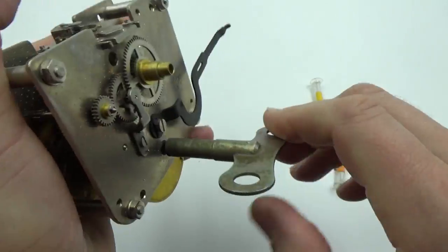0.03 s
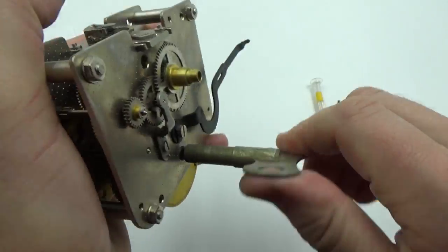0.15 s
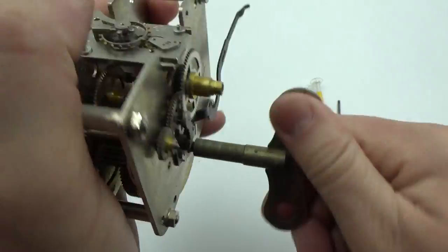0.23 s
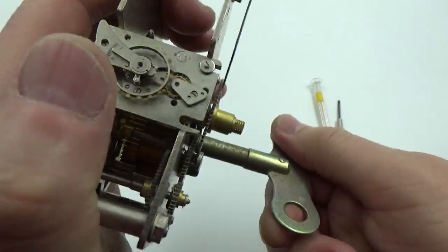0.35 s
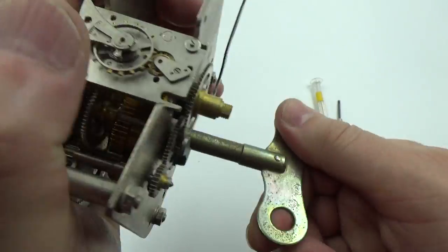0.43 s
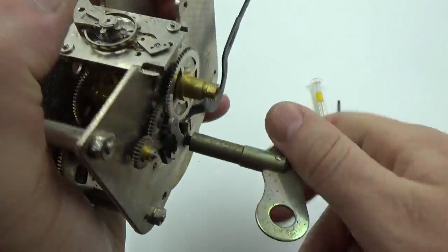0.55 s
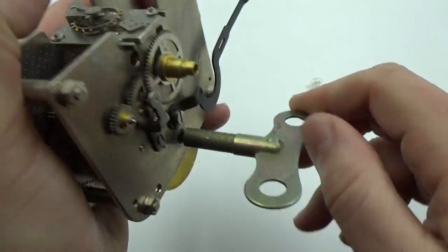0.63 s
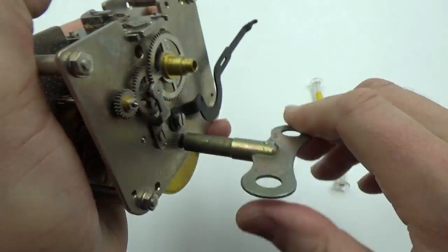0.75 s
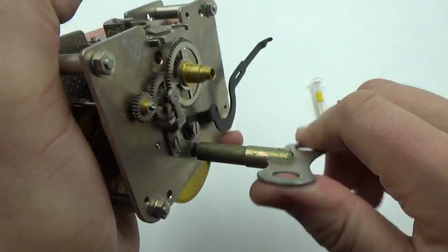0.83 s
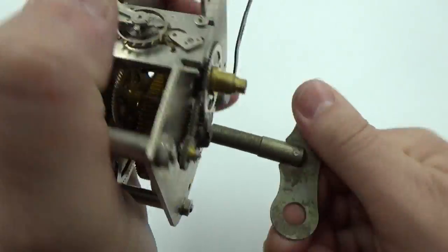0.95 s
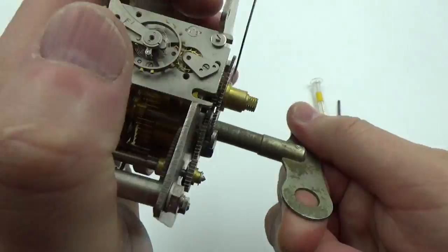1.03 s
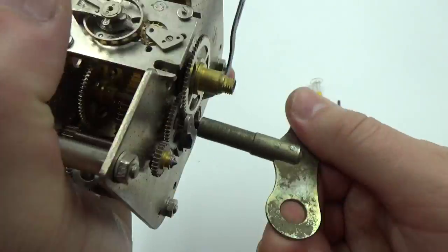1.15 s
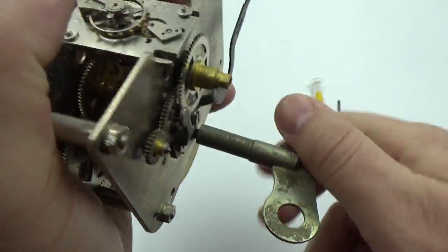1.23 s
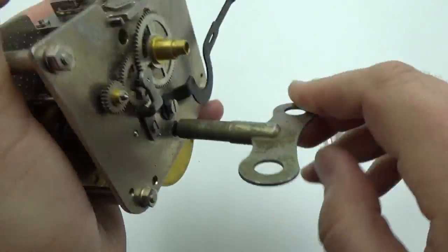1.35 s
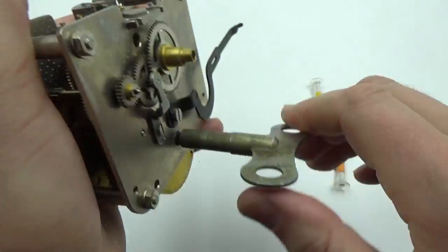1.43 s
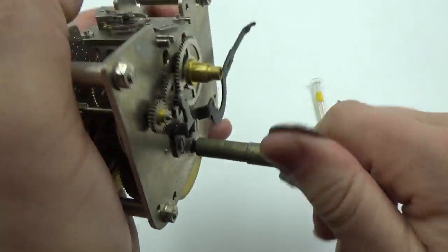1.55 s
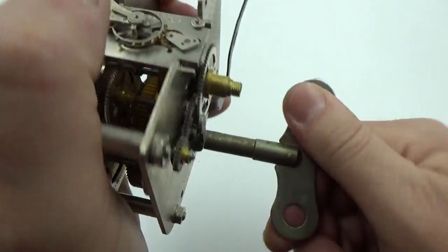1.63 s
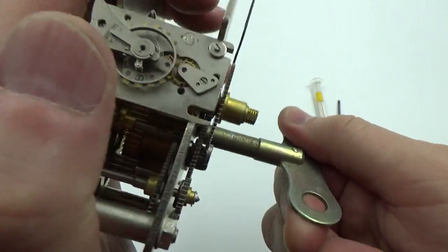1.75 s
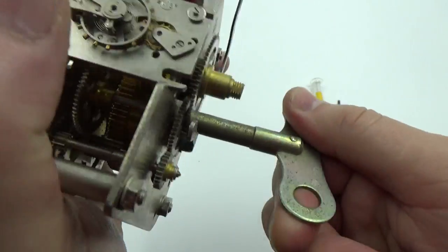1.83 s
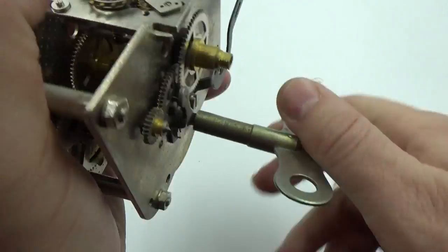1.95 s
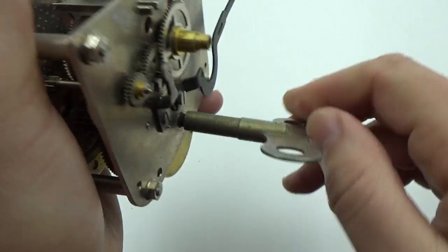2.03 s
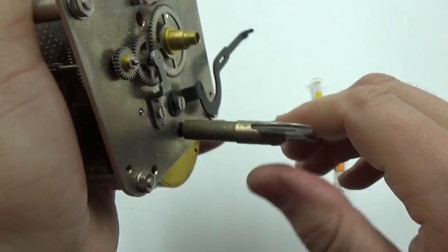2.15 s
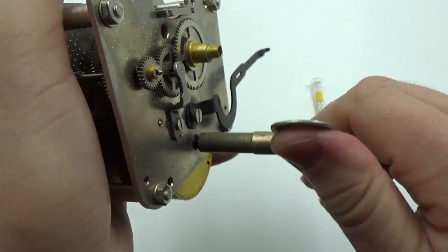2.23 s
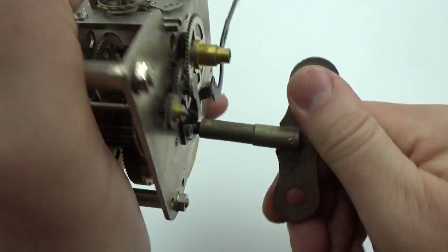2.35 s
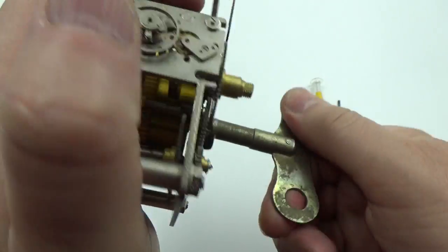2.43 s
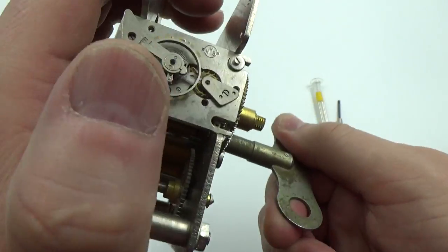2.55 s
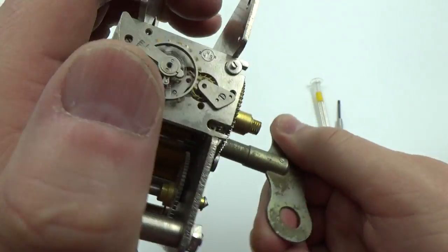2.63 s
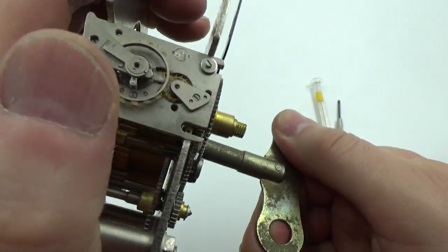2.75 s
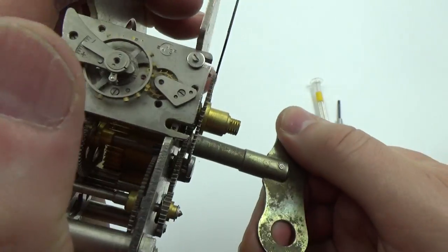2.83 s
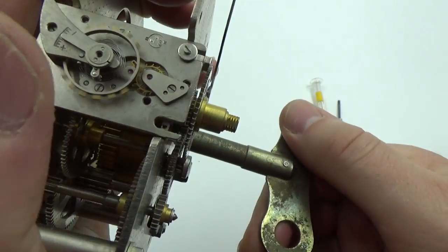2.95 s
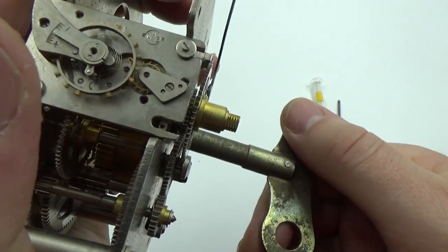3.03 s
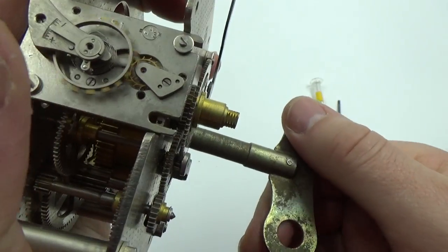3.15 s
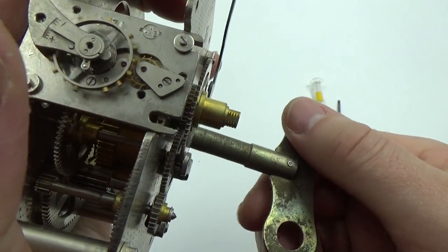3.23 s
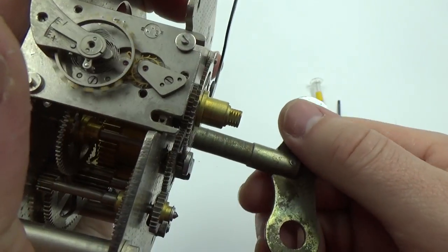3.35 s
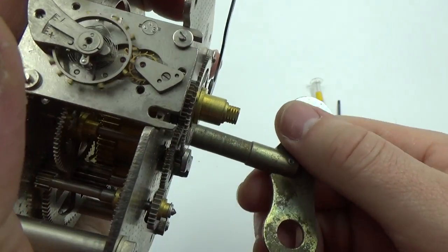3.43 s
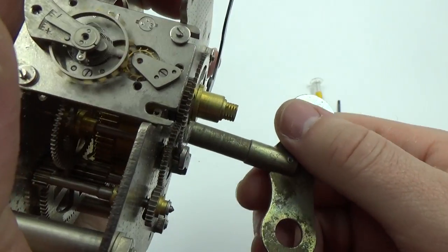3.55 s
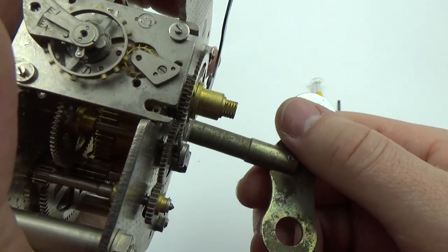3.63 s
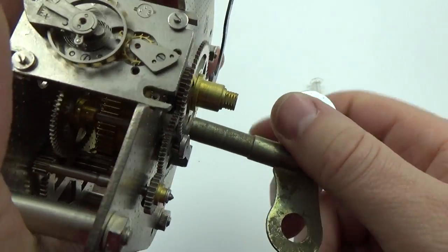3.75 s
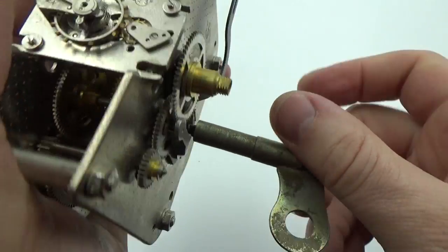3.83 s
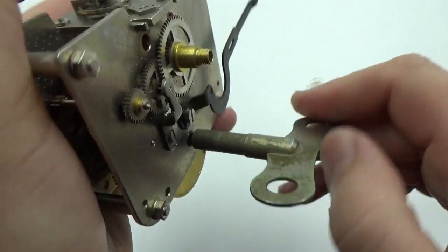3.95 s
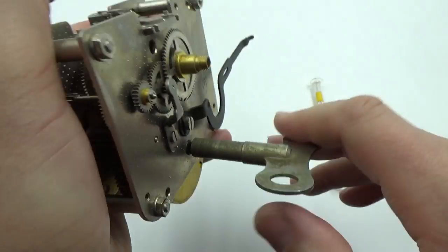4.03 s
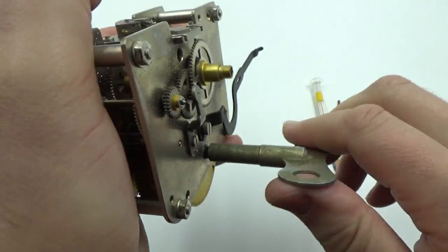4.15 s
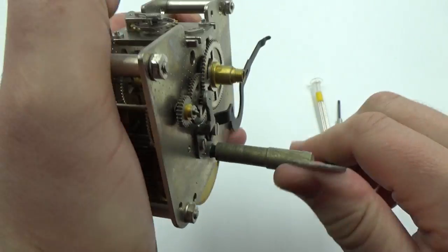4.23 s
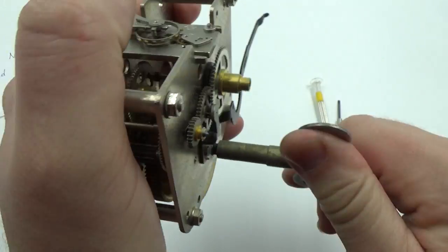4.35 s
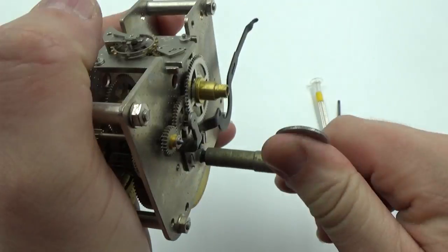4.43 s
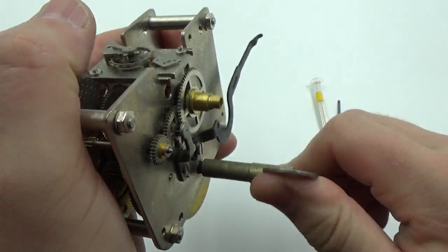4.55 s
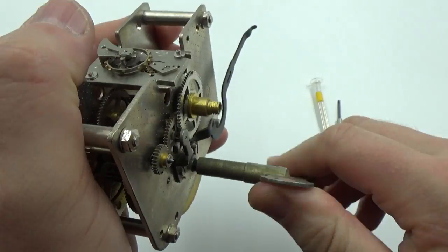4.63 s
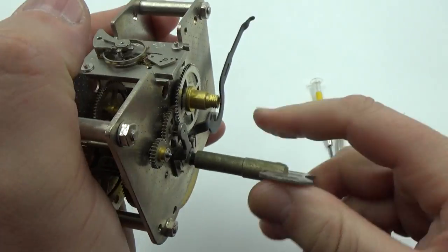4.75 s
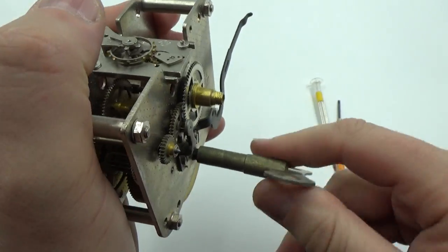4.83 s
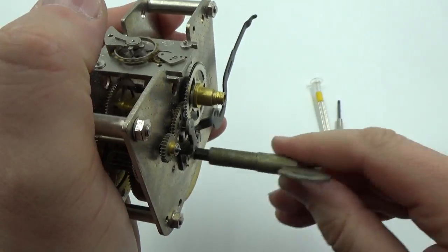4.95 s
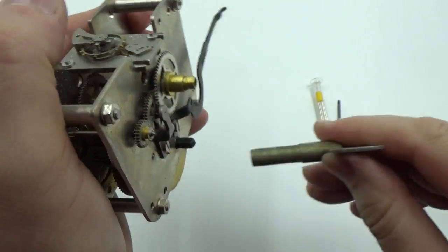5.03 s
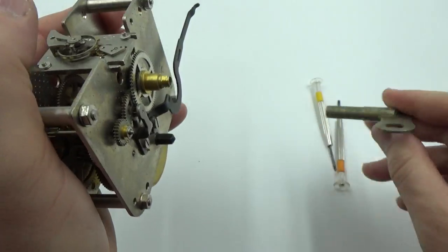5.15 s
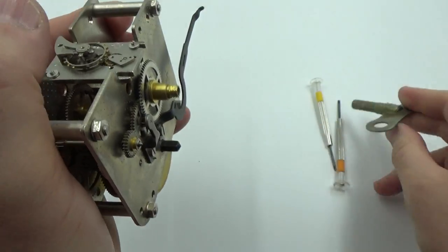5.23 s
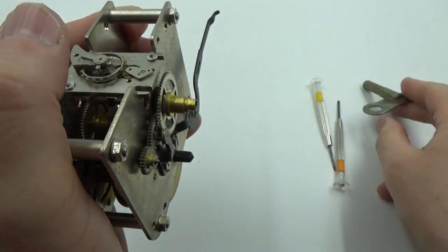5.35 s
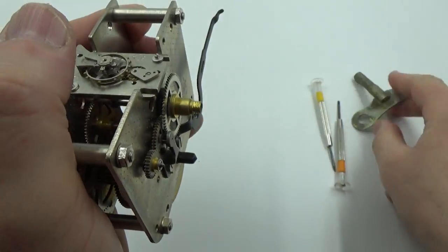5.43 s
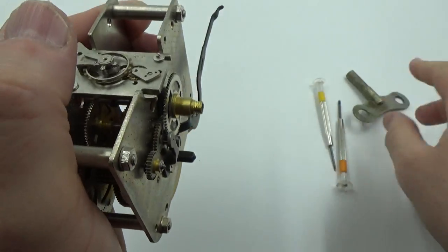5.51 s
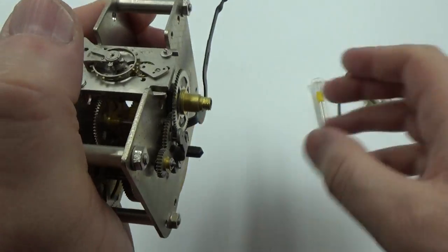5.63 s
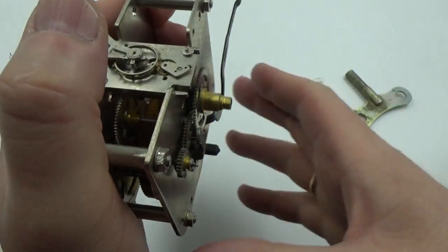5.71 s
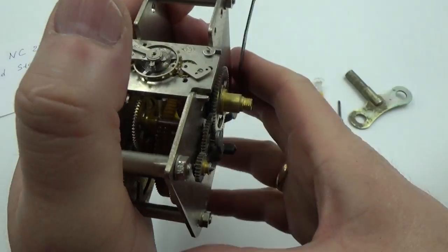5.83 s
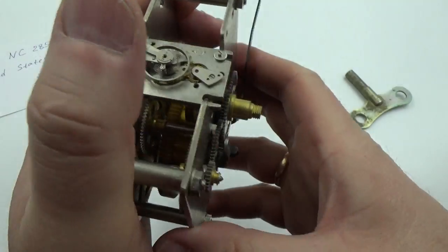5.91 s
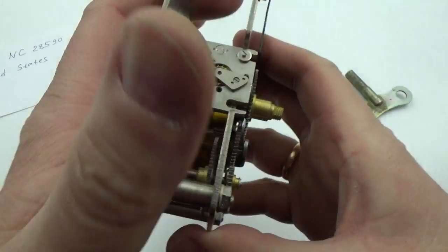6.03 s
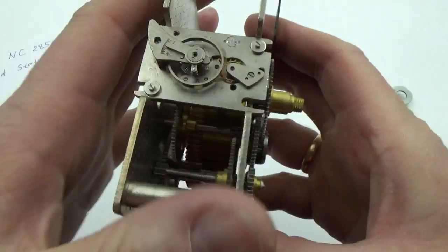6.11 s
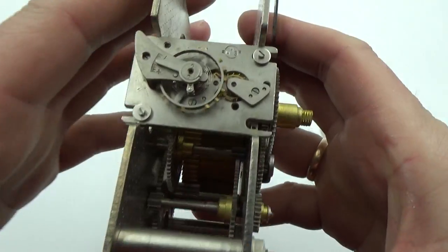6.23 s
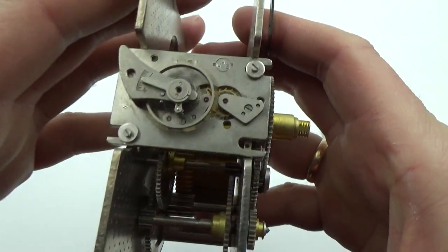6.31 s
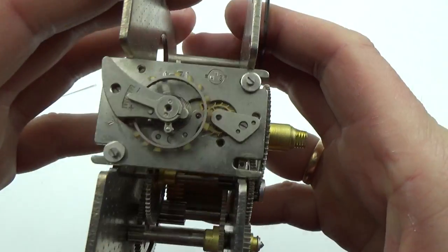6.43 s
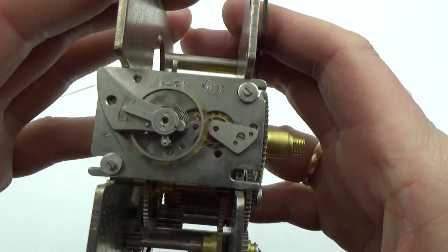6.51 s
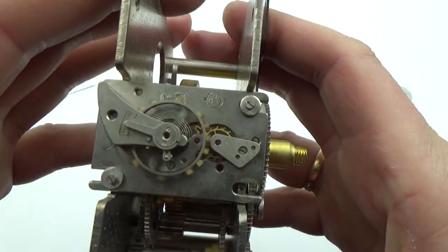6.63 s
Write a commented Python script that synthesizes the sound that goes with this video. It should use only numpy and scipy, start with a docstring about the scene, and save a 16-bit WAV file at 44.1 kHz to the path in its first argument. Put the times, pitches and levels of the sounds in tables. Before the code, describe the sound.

Very close in a small quiet room, a hand-held clock movement ticks fast and evenly, five times a second. A key winds it in four brisk bursts of bright, buzzing ratchet clicks, with clacks as the pawl catches between turns. After a pause of bare ticking comes a two-click turn; the key slides off with a light ring, lands on the bench with a woody thud and rocks to rest. Ticking continues.

```python
"""In a small room a hand-held clock movement is wound with its key, close to the microphone.
Four turns and a short fifth of ratchet clicks ring the steel plates; after each the pawl takes the spring's load.
The escapement ticks five times a second throughout. The key is drawn off its arbor and dropped on the bench.
Struck parts are noise-like contacts or short pushes exciting damped modes and a dense decaying tail;
slides are uneven grains of noise, thin parts are decaying sines, and air noise and a motor's hum lie beneath."""
import sys
import numpy as np
from scipy import signal
from scipy.fft import rfft, irfft
from scipy.io import wavfile
from scipy.ndimage import uniform_filter1d, minimum_filter1d

SR = 44100
rng = np.random.default_rng(int(sys.argv[2]) if len(sys.argv) > 2 else 0)


def materialize(psi):
    """Save the field psi as 16-bit PCM at rate SR to the path in sys.argv[1].

    A 1-D psi becomes a single channel; in a 2-D psi each row is a channel.
    """
    bounded = np.clip(np.atleast_2d(psi).T, -1, 1)
    quanta = np.round(bounded * 32767).astype(np.int16)
    wavfile.write(sys.argv[1], SR, quanta)


N = 294588
TIME = np.arange(N) / SR


def undb(db):
    """Level: decibels become an amplitude gain."""
    return 10 ** (np.asarray(db) / 20)


def unit(x):
    """Normalization: the energy along the last axis becomes one."""
    return x / np.sqrt(np.sum(x ** 2, axis=-1, keepdims=True))


def add(track, s, sound):
    """Superposition: a sound is summed into a track, starting at s seconds."""
    start = max(int(s * SR), 0)
    part = track[..., start:start + sound.shape[-1]]
    part += sound[..., :part.shape[-1]]


def through(x, response):
    """Linear filtering: a sound is convolved with an impulse response."""
    return signal.fftconvolve(np.atleast_2d(x), np.atleast_2d(response), axes=-1)[:, :N]


def colour(points, size=4096):
    """Minimum phase: folding the cepstrum gives a causal, unit-energy response with the given spectrum."""
    hz, db = np.transpose(points)
    bins = np.maximum(np.arange(size // 2 + 1) * SR / size, 1)
    magnitude = undb(np.interp(np.log(bins), np.log(hz), db))
    cepstrum = irfft(np.log(magnitude))
    cepstrum[1:size // 2] *= 2
    cepstrum[size // 2 + 1:] = 0
    return unit(irfft(np.exp(rfft(cepstrum))))


def pan(db):
    """Level difference between channels: left and right gains, left minus right in dB."""
    return undb(np.array([[db], [-db]]) / 2)


def stereo_noise(count, width):
    """Partial coherence: white noise whose side part is width times its mid part."""
    mid, side = rng.standard_normal((2, count))
    return np.array([mid + width * side, mid - width * side]) / np.hypot(1, width)


def tail(t60, width):
    """High modal density: countless overlapping resonances decay together, with unit energy."""
    t = TIME[:SR // 2]
    decay = np.exp(-np.log(1000) * t / t60)
    onset = 1 - np.exp(-t / 0.0029)
    return unit(stereo_noise(len(t), width) * decay * onset)


def body(blows, points, modes, dense_db, t60, width):
    """Modal superposition: the contact itself, a few strong damped modes and a wash of weak ones."""
    t = TIME[:SR // 2]
    response = undb(dense_db) * tail(t60, width)
    response[:, 0] += 1
    for hz, width_hz, db in modes:
        damping = np.pi * width_hz
        ringing = np.exp(-damping * t) * np.cos(2 * np.pi * hz * t)
        response += undb(db) * 2 * damping / SR * ringing
    return through(through(blows, response), colour(points))


def contact(rise, tilt_db=0, size=2048):
    """Contact stiffness: metal chatters for an instant, loudest after rise s; harder contacts tilt brighter."""
    u = TIME[:size] / rise
    envelope = (u * np.exp(1 - u)) ** 2
    hz = np.arange(size // 2 + 1) * SR / size
    octaves = np.log2(np.clip(hz, 2000, 11000) / 7000)
    chatter = irfft(rfft(rng.standard_normal(size)) * undb(tilt_db * octaves))
    return unit(chatter * envelope) * np.sqrt(np.sum(envelope ** 2))


def knocks(table, rise):
    """Superposed impacts: contacts from rows of (time [s], level [dB], tilt [dB per octave])."""
    track = np.zeros(N)
    for s, db, tilt_db in table:
        add(track, s - rise, undb(db) * contact(rise, tilt_db))
    return track


# spectrum of the air noise: (frequency [Hz], level [dB])
AIR_SPECTRUM = [(15, -39), (25, -9), (70, -6), (117, -7.5), (166, -3), (714, -8.5), (2550, -11.5),
                (4490, -19), (6920, -18.5), (8360, -14.5), (16000, -26)]
MOTOR_HZ, MOTOR_DB = 121.5, -81.5


def room_tone():
    """Stationary background: filtered air noise and a far motor's hum, wavering in amplitude and phase."""
    air = through(stereo_noise(N, width=0.65), colour(AIR_SPECTRUM))
    waver = np.interp(TIME, np.linspace(0, N / SR, 40), rng.standard_normal(40))
    hum = np.sqrt(2) * (1 + .25 * waver) * np.sin(2 * np.pi * MOTOR_HZ * TIME + .6 * waver)
    return undb(-68.5) * air + undb(MOTOR_DB) * hum


# spells in which the key is handled: (start [s], end [s])
HANDLING_SPELLS = [(0, 2.85), (3.85, 4.95)]
RATTLE_GAP_S = .17  # one rattle in each slot of this length
RATTLE_DB, RATTLE_SCATTER_DB, RATTLE_TILT_DB = -46.5, 3, -7.5


def rattles():
    """Random loose contact: faint knocks at uneven moments, as rows of time, level and tilt."""
    slots = np.concatenate([np.arange(start, end, RATTLE_GAP_S) for start, end in HANDLING_SPELLS])
    chance = rng.uniform(-0.79, 1, (len(slots), 3))
    rows = []
    for s, (when, force, dull) in zip(slots, chance):
        moment = s + RATTLE_GAP_S * (1 + when) / 2
        rows.append((moment, RATTLE_DB + RATTLE_SCATTER_DB * force, RATTLE_TILT_DB * (1 + dull)))
    return rows


# the key knocking on its arbor as it is gripped and let go: (time [s], level [dB], tilt [dB per octave])
KEY_KNOCKS = [(0.1579, -35.5, -11), (0.1707, -36, 6), (0.2014, -38.5, -4.5), (0.216, -34.5, 2.5),
              (0.4714, -17, 6), (0.566, -41, -21), (0.732, -42, -1.5), (0.9007, -25, 0),
              (1.1503, -30.5, 0.5), (1.242, -41.5, -19.5), (1.5228, -35.5, -4), (1.5631, -36, 5.5),
              (1.5913, -31.5, 15), (2.1109, -37, -5), (2.248, -32, -11), (2.2541, -31.5, 3.5),
              (2.3107, -25.5, -1.5), (2.6913, -38, 0), (2.7029, -22.5, 0.5), (2.8316, -36.5, 4),
              (3.2441, -51, -9.5), (3.73, -49.5, -9.5), (4.0032, -32.5, 3), (4.069, -32.5, -4.5),
              (4.2333, -44.5, 8), (4.2476, -40.5, 0), (4.268, -40.5, -0.5), (4.4659, -38.5, -2),
              (4.62, -30, 24)]
# the key eases back until the pawl takes the spring's load:
# (seated [s], level [dB], tilt [dB per octave], jolt [dB], sliding back [s])
PAWL_CATCHES = [(0.4915, -23, -0.5, -48, .028), (1.1771, -22.5, -0.5, -50.5, .012),
                (1.8746, -29.5, -3.5, -50.5, .009), (2.7286, -29.5, 1.5, -50, .03),
                (4.3654, -29, -43, -57.5, .005), (4.6134, -24.5, 1, -51, .022)]
# spectrum of the knocks: (frequency [Hz], level [dB])
KNOCK_SPECTRUM = [(40, -32), (300, -30.5), (1200, -25.5), (1800, -14.5), (3000, -12.5), (4700, -6),
                  (7000, -3.5), (9600, -2.5), (11000, -9.5), (13000, -14.5), (16000, -26.5)]
# resonances of the steel plates: (frequency [Hz], bandwidth [Hz], lift [dB])
STEEL_PLATE_MODES = [(1947, 45, 11), (2396, 38, 8.5), (2474, 50, 6), (3430, 33, 9), (4550, 110, 2.5),
                     (4850, 77, 6), (6300, 110, 0.5), (8650, 30, -7), (7800, 120, -15.5), (9680, 120, -8),
                     (9900, 720, -0.5), (11500, 340, 3), (15600, 22, -10)]
HARD_KNOCK_DB = -28  # louder knocks begin with a light touch
TOUCH_S, TOUCH_DB = 0.0041, -10  # the touch: lead before the knock, level relative to it
GRAZE_S, GRAZE_DB = 0.0058, -4.5  # the pawl grazing the tooth: lead before it seats, relative level


def clacks():
    """Impact excitation: key and pawl knock on the plates; at each catch the pawl grazes, then seats."""
    touches = [(s - TOUCH_S, db + TOUCH_DB, tilt_db) for s, db, tilt_db in KEY_KNOCKS if db > HARD_KNOCK_DB]
    grazes = [(s - GRAZE_S, db + GRAZE_DB, tilt_db) for s, db, tilt_db, _, _ in PAWL_CATCHES]
    seats = [(s, db, tilt_db) for s, db, tilt_db, _, _ in PAWL_CATCHES]
    blows = knocks(touches + KEY_KNOCKS + grazes + seats + rattles(), rise=.0009)
    plates = body(blows, KNOCK_SPECTRUM, STEEL_PLATE_MODES, dense_db=2.0, t60=0.063, width=0.4)
    return pan(.8) * plates


# a knock also jolts the frame, the more the duller it is: dB relative to the knock, dB per unit of tilt
KNOCK_JOLT_DB, DULL_JOLT_DB = -41, 1.22


def jolts(push_s=0.00068):
    """Heavy damping: the hand damps the frame, so each jolt is one short dull push."""
    pushes = np.zeros(N)
    from_pawl = [(s, jolt_db) for s, _, _, jolt_db, _ in PAWL_CATCHES]
    from_key = [(s, db + KNOCK_JOLT_DB - DULL_JOLT_DB * tilt_db) for s, db, tilt_db in KEY_KNOCKS]
    for s, db in from_pawl + from_key:
        add(pushes, s, undb(db) * np.exp(-TIME[:256] / push_s))
    # (frequency [Hz], level [dB])
    dull = [(25, -15), (70, -7.5), (150, -5), (400, -1.0), (800, -1), (1200, -8), (3000, -22.0), (16000, -43)]
    return undb(4.5) * body(pushes, dull, [], dense_db=-7, t60=0.069, width=0.056)


# unlocking, impulse and drop in one beat: (lead before the drop [s], level [dB], rise [s])
BEAT_CONTACTS = [(.0195, -18, .0011), (.0095, -11.5, .0013), (0, 0, .0014)]
# the beats drift a few milliseconds, first late, then early, during the winding: (time [s], lead [s])
BEAT_DRIFT = [(.2, -.002), (.9, 0), (1.4, .0045), (2.0, .005), (2.4, 0)]
# how the hand turns the escapement toward the microphone:
# (time [s], level [dB], left minus right [dB], bare click relative to the beat [dB])
ESCAPEMENT_FACING = [(.2, -38.5, 4, -17), (1.9, -42.5, 3, -17), (3.0, -38.5, 4, -15),
                     (4.801, -43, 4.5, -14), (5.4, -40.5, 4, -11.5), (5.8, -37, 2.5, -23),
                     (6.15, -39, 2.5, -4), (6.55, -39, 2, -6)]
# spectrum of the beats: (frequency [Hz], level [dB])
TICK_SPECTRUM = [(100, -41.5), (1100, -24), (2000, -10), (4000, -10.5), (6500, -8.5), (8300, -0.5),
                 (10000, 2), (11000, -8), (12500, -15), (16000, -16)]
# resonances of the escapement's platform: (frequency [Hz], bandwidth [Hz], lift [dB])
PLATFORM_MODES = [(2650, 20, 0), (5650, 70, 4), (5950, 80, 3), (8110, 65, 16), (8580, 90, 14),
                  (10150, 150, -3), (13150, 220, 4)]
# spectrum of the drop's bare click, added without the platform's ringing: (frequency [Hz], level [dB])
SNAP_SPECTRUM = [(100, -37), (1500, -21), (4000, -7), (6000, 0.5), (9000, -5.5), (13000, -2),
                 (16000, -11.5)]
# slightly out of beat: every second beat comes early
FIRST_BEAT_S, BEAT_S, OUT_OF_BEAT_S = .1835, .2, .0014
BEAT_SCATTER_DB = 0.3


def escapement(dense_db=-6):
    """Periodic impact excitation: three contacts a beat ring the platform; a bare click joins the last."""
    blows, snaps = np.zeros((2, N)), np.zeros(N)
    facing_s, *facing = np.transpose(ESCAPEMENT_FACING)
    for k, due in enumerate(np.arange(FIRST_BEAT_S, N / SR, BEAT_S)):
        lead = np.interp(due, *np.transpose(BEAT_DRIFT))
        s = due - OUT_OF_BEAT_S * (k % 2) - lead
        db, pan_db, snap_db = (np.interp(s, facing_s, column) for column in facing)
        db = db + BEAT_SCATTER_DB * rng.standard_normal()
        # the spacing of the three contacts varies at random from beat to beat
        spacing = 1 + 0.072 * rng.standard_normal()
        for early_s, part_db, rise in BEAT_CONTACTS:
            add(blows, s - early_s * spacing - rise, undb(db + part_db) * pan(pan_db) * contact(rise))
        add(snaps, s - rise, undb(db + snap_db) * contact(rise))  # with the drop's rise
    platform = undb(-1) * body(blows, TICK_SPECTRUM, PLATFORM_MODES, dense_db, t60=0.035, width=0.22)
    return platform + through(snaps, colour(SNAP_SPECTRUM))


# turns of the key; the wrist speeds up, then brakes against the spring (the short last one is even):
# (first click [s], teeth [count], starting, top and final rate [teeth per s], share spent speeding up [0-1])
KEY_TURNS = [(.2374, 11, 64.5, 108.1, 35.85, .59), (.9251, 11, 60.3, 102.8, 50, .5),
             (1.5986, 12, 56.7, 82.1, 18.46, .492), (2.3379, 10, 51.1, 57.7, 23, .532),
             (4.312, 2, 27.8, 27.8, 27.8, .5)]


def tooth_times():
    """Kinematics of the ratchet: one click a tooth, the rate rising to a crest, then braking ever harder."""
    times = []
    for start, teeth, first, top, last, crest in KEY_TURNS:
        turned = (np.arange(teeth - 1) + .5) / (teeth - 1)
        gathering = first + (top - first) * (turned / crest) ** 2
        braking = top - (top - last) * ((turned - crest) / (1 - crest)) ** 2
        rate = np.where(turned < crest, gathering, braking)
        times.extend(start + np.append(0, np.cumsum(1 / rate)))
    return times


# the key sliding on the arbor or along the bench: (start [s], end [s], level [dB])
KEY_SLIDES = [(1.569, 1.588, -44.5), (3.995, 4.011, -44), (4.989, 5.019, -40), (5.362, 5.425, -55),
              (5.44, 5.504, -52.5)]
# resonances of the key: (frequency [Hz], bandwidth [Hz], lift [dB])
FREE_KEY_MODES = [(841, 17, 24), (1060, 50, 0.5), (1777, 14, 1.6), (2570, 75, 6.5), (3530, 27, 2),
                  (5070, 41, 8), (6000, 31, 1.5), (8360, 40, 2.5), (9540, 60, 8.5)]
RIDE_UP_S, RIDE_UP_DB = 0.019, -49  # every turn begins with the pawl scraping up the first tooth
SLIDE_BACK_DB = -43


def slides(grain_db=5):
    """Stick-slip friction: surfaces catch and slip in dense uneven grains, pressing harder toward the end."""
    grains = np.zeros(N)
    easing_back = [(s - length, s, SLIDE_BACK_DB) for s, _, _, _, length in PAWL_CATCHES]
    riding_up = [(turn[0] - RIDE_UP_S, turn[0], RIDE_UP_DB) for turn in KEY_TURNS]
    for start, end, db in KEY_SLIDES + easing_back + riding_up:
        count = max(int((end - start) * SR), 64)
        catches = np.repeat(undb(grain_db * rng.standard_normal(count // 64 + 1)), 64)[:count]
        pressure = np.linspace(.4, 1, count)
        rubbing = unit(rng.standard_normal(count) * catches * pressure)
        add(grains, start, undb(db) * np.sqrt(count) * rubbing)
    # (frequency [Hz], level [dB])
    rasp = [(100, -21.0), (700, -27.0), (1300, -13), (1900, 5.5), (3500, 1.5), (6000, 3), (10000, -0.5),
            (16000, -23.5)]
    return undb(-2.5) * body(grains, rasp, FREE_KEY_MODES, dense_db=-1.5, t60=0.058, width=.35)


# spectrum of the pawl's clicks: (frequency [Hz], level [dB])
PAWL_SPECTRUM = [(40, -35.5), (180, -27), (600, -32), (1200, -29.5), (1800, -18.5), (3000, -14.5),
                 (4500, -7.5), (7500, -0.5), (9800, 2.5), (10800, -2.5), (13000, -7.5), (16000, 0)]
TOOTH_DB, TOOTH_SCATTER_DB = -11, 1.0  # every tooth lifts the pawl about equally high


def ratchet(slip_s=.0011, slip_db=-12, buzz_t60=0.14):
    """Spring-driven impact: the pawl slips over a tip, is slapped into the next gap, and buzzes as it settles."""
    rise, buzz_db = .00075, -17.5
    blows = np.zeros(N)
    t = TIME[:4096]
    for s in tooth_times():
        db = TOOTH_DB + TOOTH_SCATTER_DB * rng.standard_normal()
        add(blows, s - rise - slip_s, undb(db + slip_db) * contact(rise))
        add(blows, s - rise, undb(db) * contact(rise))
        flutter = np.repeat(undb(2 * rng.standard_normal(len(t) // 32)), 32)
        buzz = flutter * rng.standard_normal(len(t)) * np.exp(-np.log(1000) * t / buzz_t60)
        add(blows, s, undb(db + buzz_db) * buzz)
    plates = body(blows, PAWL_SPECTRUM, STEEL_PLATE_MODES, dense_db=-7, t60=.085, width=1.2)
    return undb(0.67) * pan(1.4) * plates


# fingers shifting their grip on the frame: (middle [s], spread [s], level [dB])
GRIP_SHIFTS = [(.60, .04, -70), (.835, .012, -66), (1.40, .06, -67), (1.52, .02, -66), (2.15, .06, -70),
               (6.3, .07, -66)]


def fingers():
    """Soft friction: skin dragging on the frame makes a low rumble that swells and fades."""
    pressure = sum(undb(db) * np.exp(-.5 * ((TIME - s) / spread) ** 2) for s, spread, db in GRIP_SHIFTS)
    # (frequency [Hz], level [dB])
    soft = [(30, -16.5), (90, -4.0), (140, 8.5), (200, -8.0), (300, -6.0), (700, -25.5), (3000, -26),
            (16000, -35.0)]
    return through(pressure * rng.standard_normal(N), colour(soft))


# thin steel parts set ringing: (time [s], pitch [Hz], level [dB], decay by 60 dB [s])
THIN_PART_RINGS = [(.901, 4980, -30, .07), (2.31, 5000, -35, .06), (2.317, 5000, -34, .06),
                   (4.984, 2650, -57, .11), (5.013, 1830, -43, .09), (5.029, 4930, -39, .08),
                   (5.126, 2650, -52, .11), (5.405, 780, -47, .16), (5.784, 2650, -58, .16)]


def pings():
    """Single-mode free decay: a touch sets the key's wing or a thin lever ringing on one note."""
    rings, t = np.zeros(N), TIME[:SR // 3]
    for s, hz, db, t60 in THIN_PART_RINGS:
        add(rings, s, undb(db) * np.sin(2 * np.pi * hz * t) * np.exp(-np.log(1000) * t / t60))
    return rings


def bounces(timing, force):
    """Inelastic bouncing: gaps and levels shrink steadily, as rows of time, clink, tilt and thud."""
    start, count, gap, ratio = timing
    clink_db, tilt_db, thud_db, fall_db = force
    rows = []
    for k in range(count):
        s = start + gap * (1 - ratio ** k) / (1 - ratio)
        rows.append((s, clink_db - k * fall_db, tilt_db, thud_db - k * fall_db))
    return rows


# the loose key touching the arbor's end, then the bench:
# (time [s], clink [dB], tilt [dB per octave], thud of the bench [dB])
LOOSE_KEY_TOUCHES = [(5.0286, -30, 5, -90), (5.1261, -43, 7.5, -90), (5.3267, -45.5, -6, -32),
                     (5.3785, -38.5, -1.5, -35), (5.3854, -34.5, -4.5, -19.5), (5.4019, -39.5, -11, -29),
                     (5.4977, -27.5, -4.5, -22), (5.505, -30.5, 5.5, -12.5), (5.5363, -37.5, -5, -18),
                     (5.5524, -29, 1, -14)]
# the key drums flat on the board, then rocks from wing to wing:
# (start [s], bounces [count], first gap [s], ratio of each gap to the last)
DRUMMING_TIMING = (5.555, 5, .004, .8)
ROCKING_TIMING = (5.571, 7, .018, .9)
# their first bounces: (clink [dB], tilt [dB per octave], thud [dB], fall from each bounce to the next [dB])
DRUMMING_LEVELS = (-37, -4, 1.5, 0.5)
ROCKING_LEVELS = (-33.5, -3, -11.5, 1.5)


def key_touches():
    """Successive impacts: every touch of the loose key, from leaving the arbor to lying still."""
    drumming = bounces(DRUMMING_TIMING, DRUMMING_LEVELS)
    rocking = bounces(ROCKING_TIMING, ROCKING_LEVELS)
    return LOOSE_KEY_TOUCHES + drumming + rocking


# spectrum of the free key: (frequency [Hz], level [dB])
KEY_SPECTRUM = [(100, -10.5), (600, -24), (1500, 4.5), (3000, -3), (5000, -4), (9000, 1.5), (11000, -5),
                (16000, -21.5)]


def key():
    """Free vibration: the unheld key rings briefly in its own modes at each touch."""
    touches = [(s, db, tilt_db) for s, db, tilt_db, _ in key_touches()]
    blows = knocks(touches, rise=0.00063)
    return undb(3.0) * body(blows, KEY_SPECTRUM, FREE_KEY_MODES, dense_db=1, t60=0.046, width=0.49)


# spectrum of the bench: (frequency [Hz], level [dB])
BENCH_SPECTRUM = [(30, -37), (60, -16), (120, -1), (200, 3), (300, -3), (420, -1), (520, -7.5), (680, 1.5),
                  (900, -5.5), (1600, -9.5), (2100, -22), (4000, -26), (16000, -65)]
# resonances of the board: (frequency [Hz], bandwidth [Hz], lift [dB])
BOARD_MODES = [(115.4, 9.2, 5.5), (200, 17, -15.5), (408, 21, -20), (604, 40, 4), (682, 24, -5.5),
               (868, 22, -3.5), (1480, 150, -3)]


def bench():
    """Impulse response of a board: each landing of the key is a single-sample push that sets it thudding."""
    blows = np.zeros(N)
    for s, _, _, db in key_touches():
        add(blows, s, undb([db]))
    board = body(blows, BENCH_SPECTRUM, BOARD_MODES, dense_db=-7.5, t60=0.47, width=0.27)
    return undb(-3.0) * pan(-.7) * board


def room(x, split_hz=6500):
    """Reverberation: near walls answer after 5 ms, with the treble weaker than the rest."""
    low_pass = signal.butter(2, split_hz, fs=SR, output="sos")
    high_pass = signal.butter(2, split_hz, "high", fs=SR, output="sos")
    low = signal.sosfilt(low_pass, tail(t60=0.37, width=0.35))
    high = signal.sosfilt(high_pass, tail(t60=0.44, width=0.42))
    walls = np.pad(undb(-13.5) * low + undb(-25.5) * high, ((0, 0), (int(.005 * SR), 0)))
    return through(x, walls)


def scene():
    """Superposition of direct and reverberant sound: everything happens at arm's length in one small room."""
    winding = clacks() + jolts() + escapement() + slides() + ratchet() + fingers()
    near = winding + pings() + key() + bench()
    return near + room(near) + room_tone()


# how well two close microphone ports tell left from right: (frequency [Hz], gain of the side part [dB])
PORT_SIDE_GAIN = [(60, -11), (150, -11.5), (400, -1.5), (2000, 1.5), (5000, -1), (8500, -0.5), (12000, -7),
                  (16000, -12.5)]


def ports(x):
    """Spatial coherence: two ports close together hear the bass and the top treble almost alike."""
    hz, db = np.transpose(PORT_SIDE_GAIN)
    bins = np.maximum(np.arange(N // 2 + 1) * SR / N, 1)
    mid, side = (x[0] + x[1]) / 2, (x[0] - x[1]) / 2
    side = irfft(rfft(side) * undb(np.interp(np.log(bins), np.log(hz), db)), N)
    return np.array([mid + side, mid - side])


def record(dry, size=25):
    """Band limiting and peak limiting: deep bass is thinned, sharp clicks held to a ceiling, the top cut."""
    ceiling, top_hz = .48, 15720
    heard = signal.sosfilt(signal.butter(2, 36, "high", fs=SR, output="sos"), ports(dry))
    needed = np.minimum(1, ceiling / (np.abs(heard).max(axis=0) + 1e-9))
    gain = uniform_filter1d(minimum_filter1d(needed, size), size)  # smoothed over size samples
    return signal.sosfilt(signal.ellip(10, .2, 70, top_hz, fs=SR, output="sos"), heard * gain)


dry = scene()
out = record(dry)
materialize(out)
```